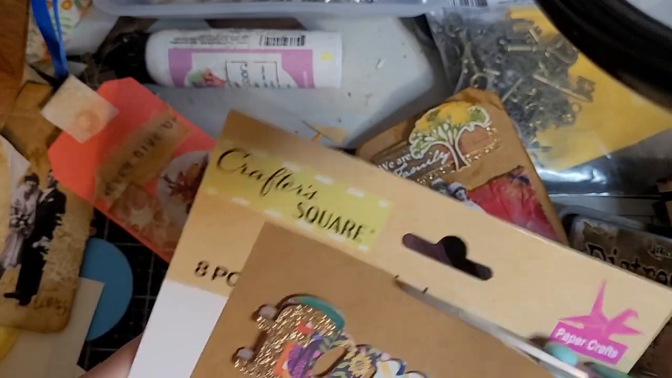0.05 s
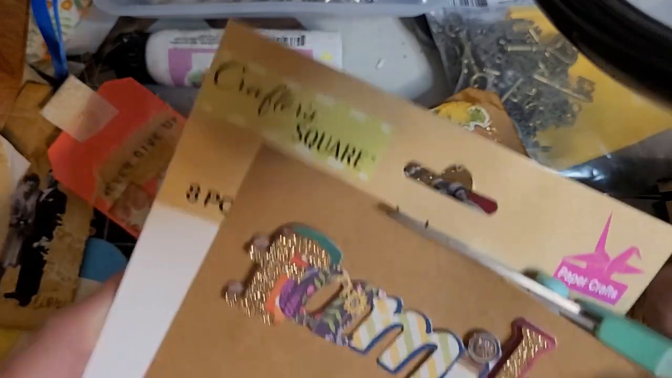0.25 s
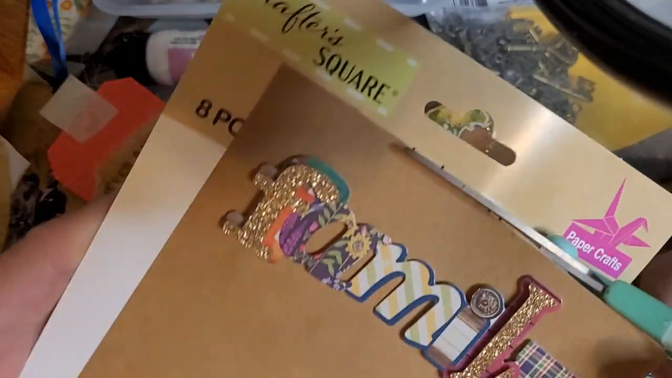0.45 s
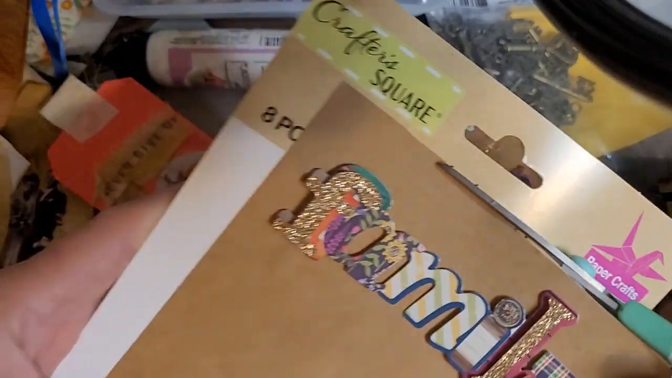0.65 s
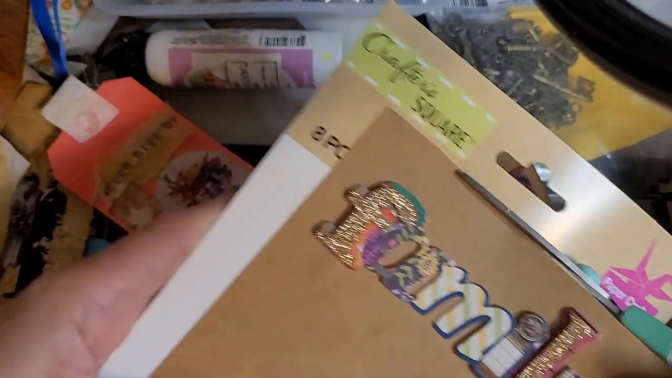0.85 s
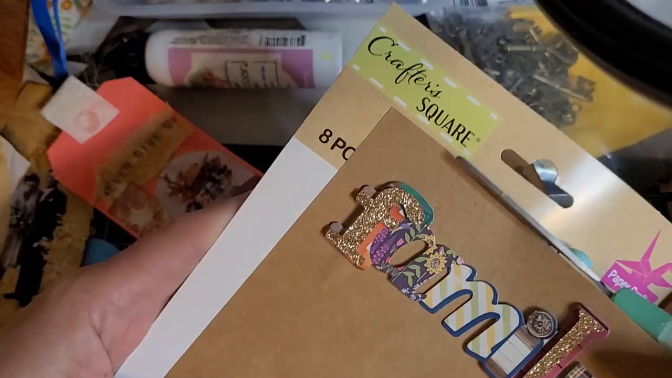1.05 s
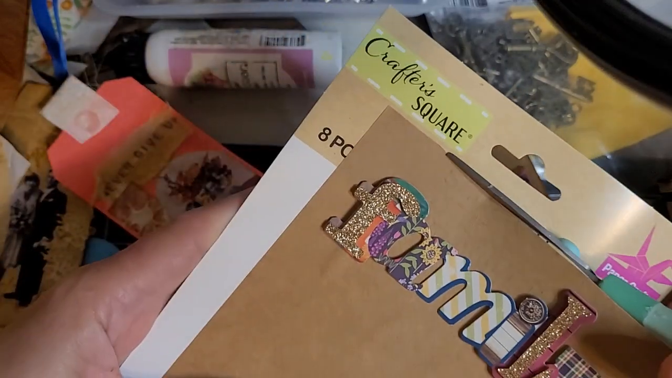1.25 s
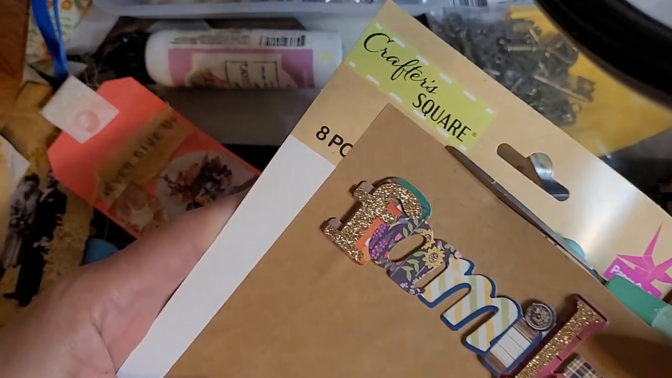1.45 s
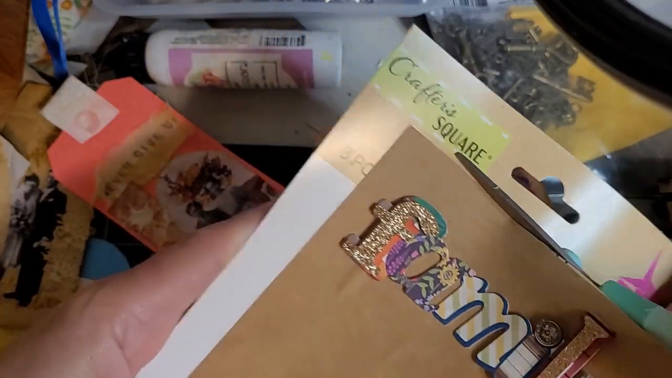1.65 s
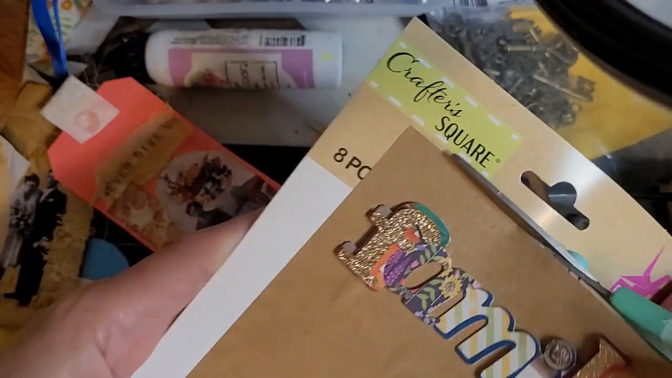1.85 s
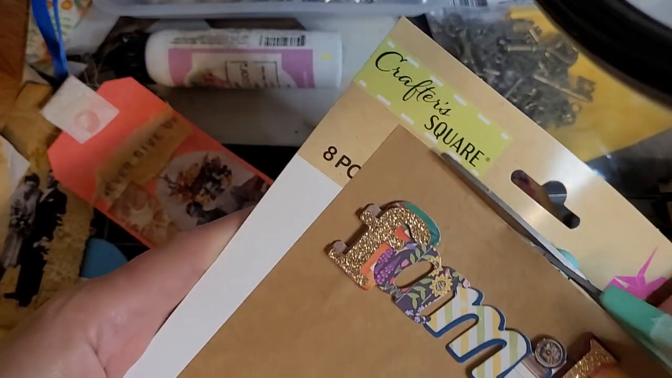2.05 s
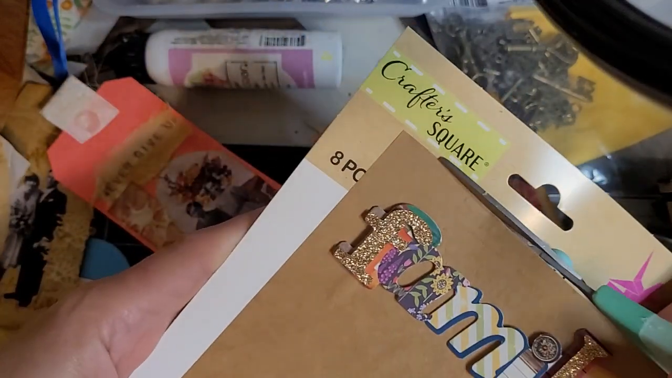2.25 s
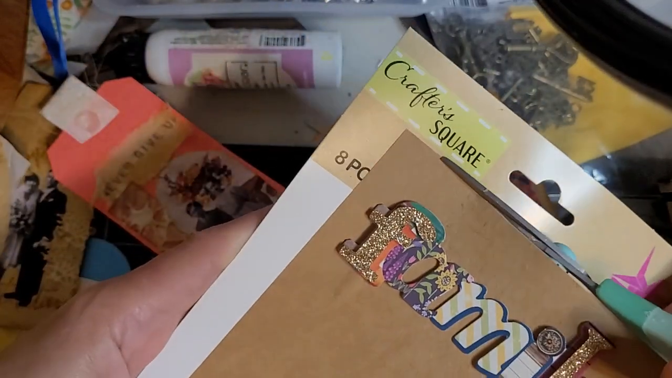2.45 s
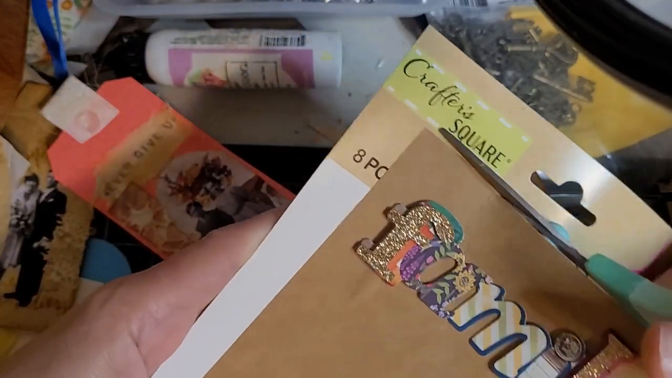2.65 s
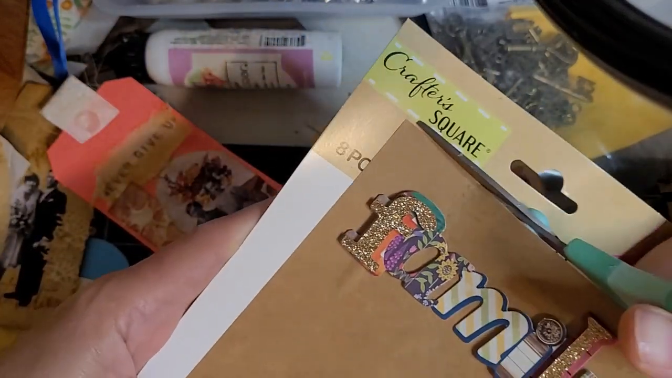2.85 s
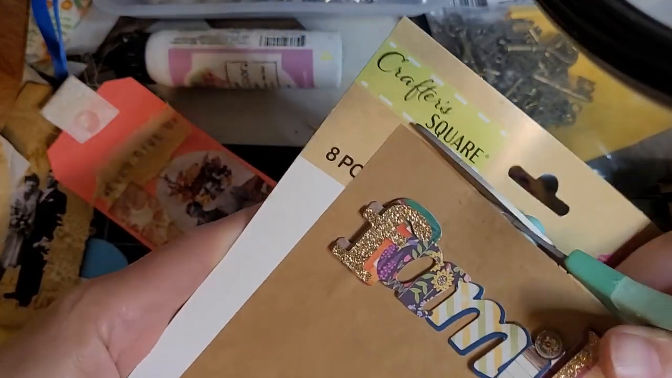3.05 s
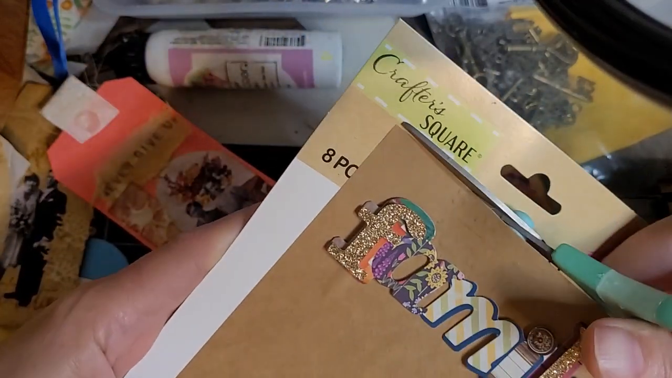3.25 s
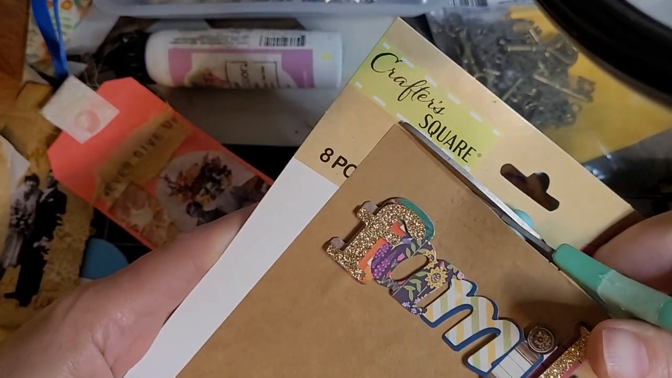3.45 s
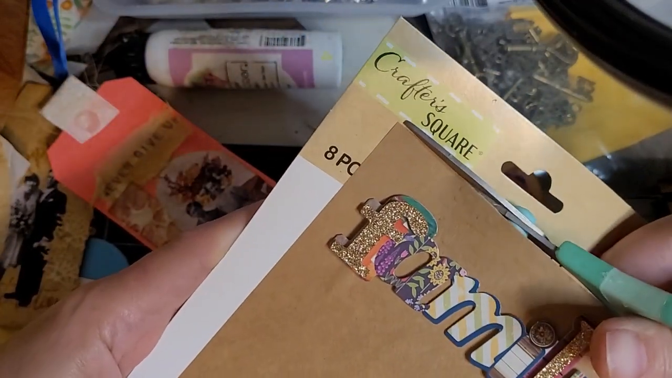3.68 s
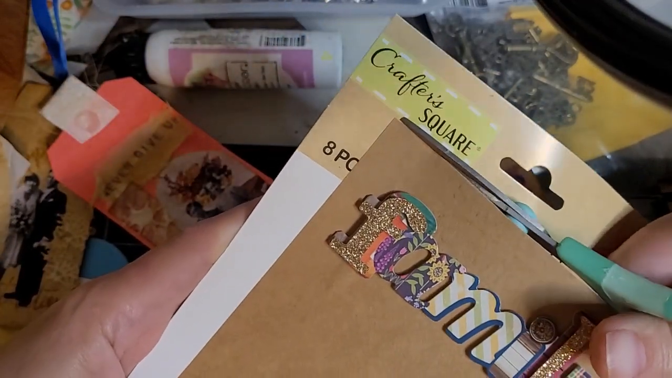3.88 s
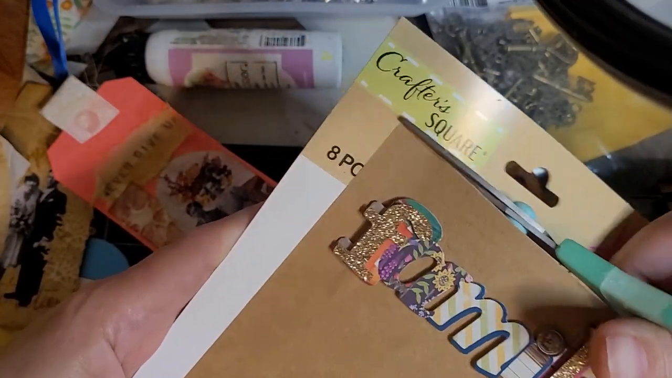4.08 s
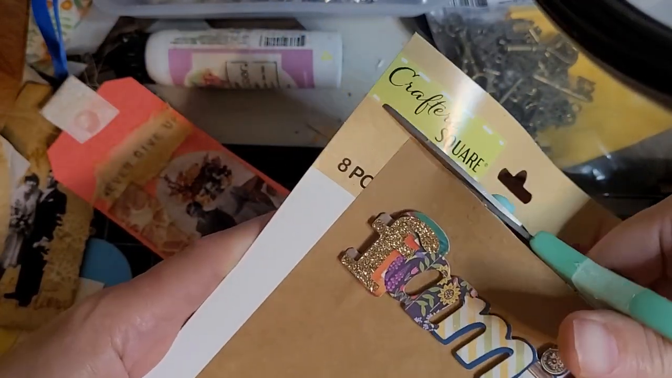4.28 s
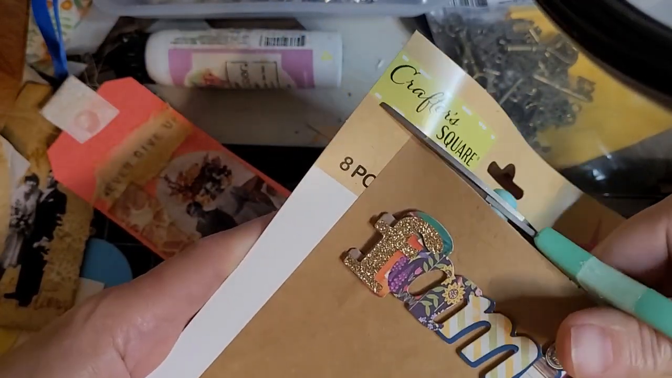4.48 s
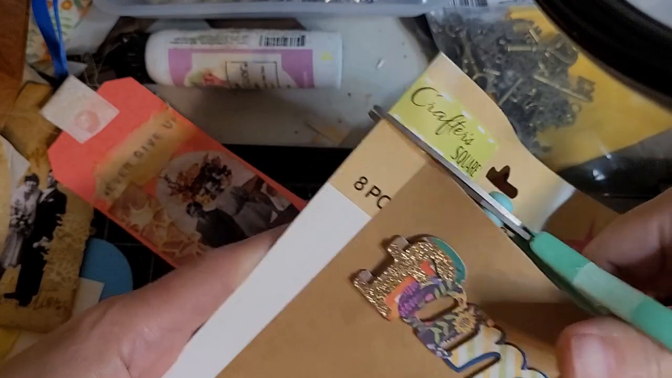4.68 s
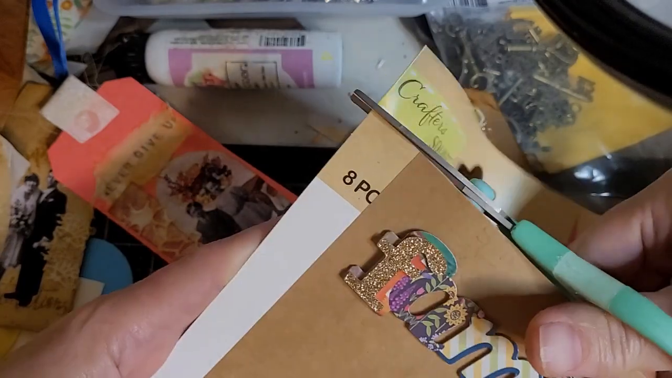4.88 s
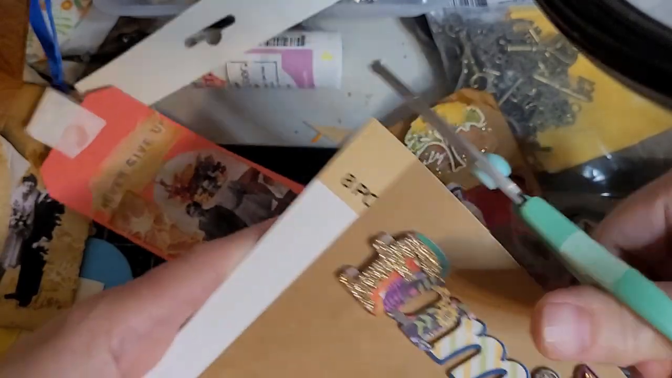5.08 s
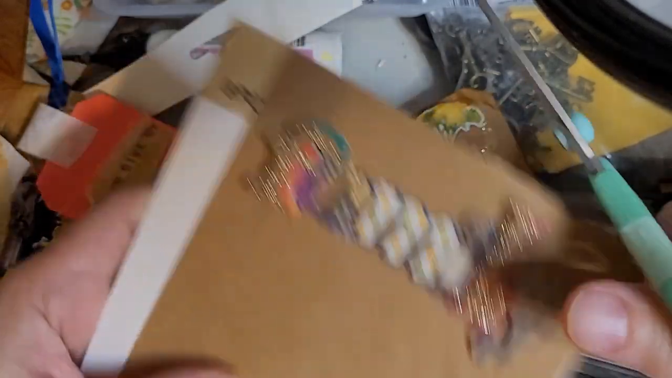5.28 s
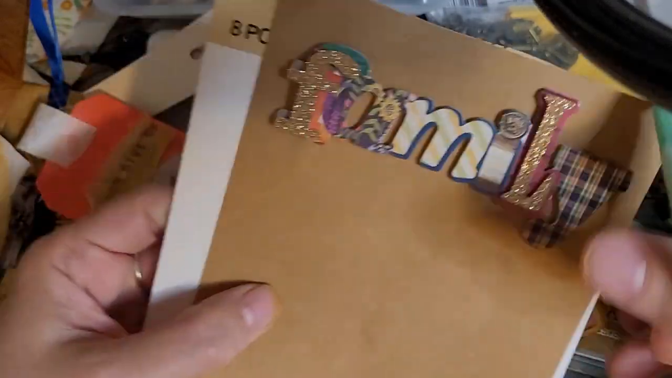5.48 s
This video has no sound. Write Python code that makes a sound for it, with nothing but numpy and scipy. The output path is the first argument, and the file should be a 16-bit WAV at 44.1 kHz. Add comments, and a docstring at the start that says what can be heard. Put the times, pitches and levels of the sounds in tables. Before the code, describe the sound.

A stiff card header is cut off by hand with scissors. Sparse scrapes and small crunches lead to a sharp pop of flexing card, followed by a gentle bump, grainy snips and a quiet pause around 3.3 seconds. A metallic click restarts the cutting, which becomes busier and ends in a strong snap and faint handling. Close stereo phone microphone, short room tail, faint low air.

```python
"""Scissors cut the header off a stiff card package, close to a phone above a craft table in a small room.
The card parts in jerks and friction grains rasp between them; each contact excites a resonant sheet
whose pitch changes as it bends, plus shaped noise clicks. The card snaps as it is flexed and as the strip
comes free, the steel ticks as damped modes, and the hands jolt softly as slow ones.
A short diffuse room tail and faint low air noise surround it."""
import sys
import numpy as np
from scipy import signal
from scipy.fft import rfft, irfft
from scipy.io import wavfile

SR = 44100
rng = np.random.default_rng(int(sys.argv[2]) if len(sys.argv) > 2 else 0)


def wav_record(signal):
    """Record a signal, one row per channel, as 16-bit PCM in the file named by sys.argv[1]."""
    frames = np.transpose(np.atleast_2d(signal))
    bounded = np.clip(frames, -1, 1)
    # unit amplitude maps onto the largest positive 16-bit level
    quanta = np.round(bounded * 32767).astype(np.int16)
    wavfile.write(sys.argv[1], SR, quanta)


N = 243644
TIME = np.arange(N) / SR
RING = TIME[:8192]  # time axis of every ringing response [s]

# Groups of jerks as the card parts, spaced evenly within each group; crack, fizz and edge relative to the sheet:
# (first jerk [s], last jerk [s], count, jerk length [s], sheet level [dB], swell over the group [dB],
#  crack [dB], fizz [dB], steel edge [dB], sheet pitch [Hz])
JERK_GROUPS = [(0.099, 0.116, 2, 0.018, -36.5, -4, -10, -12, -27, 800),
               (0.604, 0.664, 4, 0.012, -53, 4.5, -0.5, -5.5, -5.5, 690),
               (0.736, 0.76, 2, 0.012, -50.5, 1, 0, -8, -11, 720),
               (1.17, 1.266, 5, 0.017, -46, 6.5, -5.5, -11.5, -7, 805),
               (2.201, 2.251, 3, 0.018, -42.5, 1, -4, -6.5, -6.5, 1126),
               (2.346, 2.377, 2, 0.015, -30.5, 1, -10.5, -14, -17, 526),
               (2.552, 2.574, 2, 0.021, -38, -1, -5, -16.5, -26, 900),
               (2.627, 2.686, 2, 0.013, -36, 0, -6, -16, -25.5, 653),
               (3.603, 3.624, 2, 0.015, -39.5, 4, -6.5, -9.5, -10, 920),
               (3.734, 3.753, 2, 0.015, -40, 3, -5.5, -9, -12, 940),
               (3.785, 3.808, 2, 0.015, -42.5, 3, -3, -11, -11.5, 880),
               (3.847, 3.87, 2, 0.017, -37.5, 0.5, -7, -13, -22, 910),
               (3.903, 3.916, 2, 0.013, -43, -3, -7, -13.5, -22, 890),
               (4.428, 4.454, 2, 0.015, -37.5, 7, -8, -7.5, -25, 610),
               (4.486, 4.517, 2, 0.018, -37.5, -3, 0.5, -4, -18, 690),
               (4.552, 4.586, 2, 0.011, -43.5, -6, 6.5, 3.5, -21, 785),
               (4.922, 4.943, 2, 0.0096, -35.5, 1.5, 0.5, 0, -5, 830),
               (5.058, 5.079, 2, 0.013, -43, -4, 2.5, -1.5, -23, 950)]
# Further single jerks of parting card; crack and fizz are relative to the sheet:
# (time [s], sheet level [dB], crack [dB], fizz [dB], sheet pitch [Hz])
SINGLE_JERKS = [(0.138, -46, -7, -26, 550), (0.692, -48, -13, -14, 680), (0.788, -54.5, -5, -10.5, 676),
                (0.861, -45, 0.5, -32, 860), (1.661, -35.5, 0, -5.5, 645), (2.303, -54, -2, -1.5, 940),
                (2.425, -53, -3, -7.5, 955), (3.69, -50, -2.5, -8, 1080), (3.95, -37, -3, -7.5, 884),
                (4.175, -38.5, -6, -24, 440), (4.473, -44.5, -3.5, -7, 706), (5.126, -40, -9.5, -11.5, 480),
                (5.168, -52.5, -17, -24, 645), (5.196, -52, -2, -5, 804), (5.369, -36.5, -13.5, -21, 820)]
SINGLE_JERK_S = 0.015  # length of a single jerk
EDGE_HZ, EDGE_T60 = 11380, 0.0025  # the steel edge sings as it cuts: pitch [Hz], decay [s]


def jerks(bend_spread=0.017):
    """Stick-slip: the card parts in groups of jerks that ring sheet and steel edge, and in further single jerks."""
    out = np.zeros(N)
    for first, last, count, length, db, swell, crack, fizz, edge, hz in JERK_GROUPS:
        for progress in np.linspace(0, 1, round(count)):
            s = first + progress * (last - first)
            level = db + swell * (progress - .5)
            bent_hz = hz * np.exp(bend_spread * rng.standard_normal())
            force, sound = jerk(length, level, crack, fizz, bent_hz)
            add(out, s, sound)
            edge_sound = signal.fftconvolve(force, ring([(EDGE_HZ, 0, EDGE_T60)]))
            add(out, s, burst(edge_sound, level + edge))
    for s, db, crack, fizz, hz in SINGLE_JERKS:
        _, sound = jerk(SINGLE_JERK_S, db, crack, fizz, hz)
        add(out, s, sound)
    return out


def jerk(length, db, crack, fizz, hz, lean=0.58):
    """Fracture as a swell of impulses: fibres break in a lobe leaning early; returns force and sound."""
    progress = np.linspace(0, 1, int(length * SR))
    swell = np.sin(np.pi * progress ** lean)
    force = fibres(len(progress), per_s=9000, spread_db=3) * swell
    return force, excite(force, hz, db, db + crack, db + fizz)


def fibres(n, per_s, spread_db):
    """Sparse impulse noise: random tiny breaks of either sign, a few much larger than the rest."""
    when, size, sign = rng.random((3, n))
    strength = undb(-spread_db * np.log(np.maximum(size, .02)))
    return (when < per_s / SR) * strength * np.sign(sign - .5)


# Lower colour of parting fibres: (frequency [Hz], level [dB])
CRACK = [(700, -49), (1300, 2), (1650, -1.5), (2300, -1), (3300, -3.5), (4500, -3.5), (5800, -11.5),
         (8000, -25.5)]
# Upper colour of parting fibres: (frequency [Hz], level [dB])
FIZZ = [(4000, -30), (6000, 0.5), (9600, -0.5), (10700, -2.5), (11900, -1.5), (13500, -7), (16000, -9.5)]


def excite(force, hz, body_db, crack_db, fizz_db, tilt=0.67, usual_db=5):
    """Source-filter: a contact rings the sheet and radiates crack and fizz; less fizz also darkens their colour."""
    tilt_db = tilt * (fizz_db - crack_db + usual_db)
    parts = (
        (sheet(hz), body_db),
        (click(varied(CRACK, tilt_db)), crack_db),
        (click(varied(FIZZ, tilt_db)), fizz_db),
    )
    out = np.zeros(len(force) + len(RING))
    for response, db in parts:
        add(out, 0, burst(signal.fftconvolve(force, response), db))
    return out


def varied(points, tilt_db, vary_db=2):
    """Spectral tilt in dB per octave, with scatter: no two bunches of fibres have quite the same colour."""
    hz, db = np.transpose(points)
    octaves = np.log2(hz / hz[0])
    return np.transpose([hz, db + tilt_db * octaves + vary_db * rng.standard_normal(len(hz))])


# Fixed modes of the card sheet: (frequency [Hz], level [dB], free decay t60 [s])
SHEET = [(243.6, -4.5, 0.073), (308, -6.5, 0.053), (411, -6.5, 0.067), (506, -0.5, 0.045),
         (618, -2.5, 0.032), (761, 1.5, 0.033), (849, -1.5, 0.057), (951.5, -3, 0.055), (1140, -2.5, 0.035),
         (1277, -13, 0.044)]


def sheet(hz, bend_t60=0.023, modes_db=-3.0, radiate_hz=260):
    """Modal resonance: fixed modes plus one resonance set by the bend; a small sheet radiates little bass."""
    bend = ring([(hz, 0, bend_t60)])
    swing = bend + undb(modes_db) * ring(SHEET)
    return signal.lfilter(*signal.butter(2, radiate_hz, "high", fs=SR), swing)


def slide(catch_db=1, catch_hz=130, trim_db=-1):
    """Granular friction: fine grains catch and ease at random as blades and fingers slide on the card."""
    knots = np.arange(0, N, SR / catch_hz)
    wander = np.interp(np.arange(N), knots, rng.standard_normal(len(knots)))
    catch = undb(catch_db * wander)

    def rub(response):
        """Convolution: a fresh stream of grains drives one response."""
        return signal.fftconvolve(fibres(N, per_s=20000, spread_db=2) * catch, response)[:N]

    # the contact keeps moving, so each mode has its own grains; here its decay is halved
    body = sum(undb(db) * rub(ring([(hz, 0, t60 * .5)])) for hz, db, t60 in SHEET)
    body = signal.lfilter(*signal.butter(2, 220, "high", fs=SR), body)
    layers = body, rub(click(CRACK)), rub(click(FIZZ))
    levelled = sum(x / x.std() * level for x, level in zip(layers, stroke_levels()))
    return undb(trim_db) * levelled


# Strokes of blades and fingers on card, before the slide's trim; crack and fizz are relative to the sheet:
# (time [s], length [s], sheet level [dB], swell over the stroke [dB], crack [dB], fizz [dB])
STROKES = [(0.081, 0.056, -46.5, 7, -3, -9), (0.197, 0.087, -63, 5.5, -5, -6),
           (0.383, 0.027, -69, -4, -22, -32), (0.591, 0.24, -66, -9.5, -0.5, -5.5),
           (0.864, 0.06, -44.5, 3.5, -2.5, -7), (0.945, 0.065, -50.5, -8, -7, -17),
           (1.058, 0.082, -61, -13, -9.5, -16), (1.17, 0.086, -56, 8, -4, -6),
           (1.336, 0.084, -63, 7, -12, -17), (1.481, 0.052, -50.5, -3.5, -12.5, -16.5),
           (1.578, 0.069, -48.5, 14, -14, -18), (1.686, 0.17, -51.5, -15.5, -13, -18.5),
           (1.888, 0.035, -46.5, 11.5, -8, -10.5), (2.165, 0.087, -58.5, 7, -10, -8.5),
           (2.22, 0.2, -58.5, 4, -1.5, -6.5), (2.556, 0.03, -39.5, -5, -14, -12),
           (2.627, 0.073, -52.5, -2, -2.5, -12.5), (2.941, 0.08, -63, -2, -8, -5),
           (3.11, 0.049, -56.5, -11, -2.5, -12.5), (3.197, 0.056, -74, -6.5, -3.5, -3),
           (3.598, 0.067, -53.5, -4, -9, -13), (3.99, 0.064, -73, -4, -6, -5),
           (4.116, 0.14, -46, 0.5, -1.5, -5.5), (4.332, 0.027, -49, 2, -6, -5.5),
           (4.444, 0.19, -54.5, -17, -5, -1), (4.652, 0.036, -51.5, 19.5, -2.5, -8.5),
           (4.7, 0.07, -40, -11, -3, -6), (4.842, 0.078, -47, 0.5, 2, 2.5),
           (4.948, 0.012, -40, -7.5, 3.5, 8), (5.047, 0.1, -59, -5.5, 2.5, -5),
           (5.196, 0.15, -65.5, -8.5, 0.5, -2), (5.377, 0.13, -58, -7.5, 0.5, 5.5)]
# The held card never quite rests, before the slide's trim: (sheet [dB], crack [dB], fizz [dB])
GRIP_DB = (-79, -86, -88.5)
STROKE_ATTACK_S, STROKE_RELEASE_S = 0.007, 0.013  # time constants of taking hold and letting go


def stroke_levels():
    """Power addition: strokes take hold, swell or ease, and let go, over the resting grip."""
    power = undb(GRIP_DB)[:, None] ** 2 + np.zeros(N)
    for s, length, db, swell, crack, fizz in STROKES:
        progress = np.clip((TIME - s) / length, 0, 1)
        before = np.maximum(s - TIME, 0) / STROKE_ATTACK_S
        after = np.maximum(TIME - s - length, 0) / STROKE_RELEASE_S
        fade = np.exp(-np.minimum(before + after, 20))
        envelope = undb(db + swell * (progress - .5)) * fade
        power += np.outer(undb([0, crack, fizz]), envelope) ** 2
    return np.sqrt(power)


# Card chafing against a blade: (time [s], length [s], level [dB], pitch [Hz])
CHAFES = [(0.846, 0.15, -64, 4700), (1.077, 0.018, -61, 3180), (2.169, 0.13, -67, 4370),
          (3.09, .07, -53.5, 805), (3.489, 0.06, -83, 2500), (4.215, 0.051, -49.5, 3540),
          (4.325, 0.055, -52, 630), (4.405, 0.049, -50, 780), (4.675, .085, -40, 2580)]


def chafes(edge_t60=0.0039):
    """Friction-driven resonance: dense slips ring one well-damped resonance of the card."""
    out = np.zeros(N)
    for s, length, db, hz in CHAFES:
        n = int(length * SR)
        slips = fibres(n, per_s=9000, spread_db=0.5) * np.hanning(n)
        rasp = signal.fftconvolve(slips, ring([(hz, 0, edge_t60)]))[:n]
        rasp = signal.lfilter(*signal.butter(2, hz / 2, "high", fs=SR), rasp)
        add(out, s, rasp / rasp.std() * undb(db))
    return out


# The sheet flicking or snapping: (time [s], body [dB], crack [dB], fizz [dB], sheet pitch [Hz])
SNAPS = [(0.252, -47.5, -59, -62, 640), (1.08, -41.5, -60, -68, 840), (1.305, -40, -44, -52.5, 637),
         (1.366, -44.5, -54.5, -74, 550), (1.667, -22, -27.5, -36, 726), (1.673, -24, -36, -57, 625),
         (1.686, -20.0, -27.5, -42.5, 792), (2.123, -46.5, -69.5, -100, 465), (3.969, -34.0, -42, -46, 883),
         (4.08, -51, -67, -74, 840), (4.788, -37, -49.5, -64.0, 840), (4.822, -48.5, -66, -78, 1000),
         (4.9579, -17.5, -23, -37, 827)]


def snaps(crumble_s=0.0023, crumble_db=-4):
    """Impulse excitation: one sharp release of the sheet, then a few milliseconds of crumbling edge."""
    out, t = np.zeros(N), RING[:1024]
    for s, body, crack, fizz, hz in SNAPS:
        crumble = fibres(len(t), per_s=7700, spread_db=4.5) * np.exp(-t / crumble_s)
        force = undb(crumble_db) * unit(crumble)
        force[0] += 1
        add(out, s, excite(force, hz, body, crack, fizz))
    return out


# Steel ticking on steel: (time [s], level [dB])
TICKS = [(1.404, -55.5), (1.9172, -38.5), (2.046, -57.5), (3.648, -30.5), (5.042, -37.5)]
# Modes of the blades: (frequency [Hz], level [dB], decay t60 [s])
BLADES = [(5180, -6, 0.043), (8200, 2.5, 0.012), (9790, 2, 0.021), (11600, 4, 0.012)]


def ticks(scrape_s=0.0029, ring_db=-3):
    """Damped modal impact: blade meets blade in a tiny noise scrape and a ring damped by the hand."""
    out = np.zeros(N)
    for s, db in TICKS:
        force = rng.standard_normal(len(RING)) * np.exp(-RING / scrape_s)
        scrape = signal.lfilter(click(FIZZ) + .5 * click(CRACK), 1, force)
        add(out, s, burst(unit(scrape) + undb(ring_db) * ring(BLADES), db))
    return out


# Soft jolts of hands and sheet: (time [s], level [dB], pitch [Hz], decay t60 [s])
JOLTS = [(1.666, -37.5, 252, 0.03), (1.921, -33, 844, 0.031), (1.924, -37, 251, 0.059),
         (1.931, -38.5, 61, 0.17), (4.96, -34.5, 121, 0.05), (4.961, -41, 60, 0.14)]


def jolts(push_s=0.00067):
    """Single-mode response: a soft push, with a gradual onset, swings one damped mode."""
    out = np.zeros(N)
    for s, db, hz, t60 in JOLTS:
        onset = 1 - np.exp(-RING / push_s)
        add(out, s, burst(ring([(hz, 0, t60)]) * onset, db))
    return out


def near_path(dry, lag, smear_s=0.0015):
    """Decorrelation: treble is partly smeared by short random responses, new per ear and block, for stereo width."""
    low, high = (signal.butter(3, 1400, kind, fs=SR) for kind in ("low", "high"))
    direct = np.pad(dry, (lag, 0))[:N]  # lag in samples
    treble = signal.lfilter(*high, direct)
    smeared, hop = np.zeros(N), 256
    for start in range(0, N, hop):
        response = unit(rng.standard_normal(hop) * np.exp(-RING[:hop] / smear_s))
        add(smeared, start / SR, np.convolve(treble[start:start + hop], response))
    return signal.lfilter(*low, direct) + .7 * treble + .7 * smeared


# Room decay by band: (centre frequency [Hz], decay t60 [s], level [dB])
ROOM = [(120, 1, -9), (343, 0.14, -12), (911, 0.15, -19), (2240, 0.11, -9), (5800, 0.13, -13),
        (12000, 0.11, -14.5)]


def room(build_s=0.0024):
    """Diffuse reverberation: band-filtered decaying noise forms the short tail of a small furnished room."""
    out = 0
    for hz, t60, db in ROOM:
        band = signal.butter(2, [hz / 1.6, min(hz * 1.6, .45 * SR)], "band", fs=SR)
        decay = undb(-60 * RING / t60)
        build = 1 - np.exp(-RING / build_s)
        tail = rng.standard_normal(len(RING)) * decay * build
        out = out + undb(db) * signal.lfilter(*band, unit(tail))
    return out


# Spectrum of the still air of the room: (frequency [Hz], level [dB])
AIR = [(20, -26), (48, 5.5), (85, 0.5), (130, 3), (170, -12), (250, -2), (400, -14), (750, -13.5),
       (1200, -25.5), (2500, -50.5), (6000, -41.5), (16000, -36)]
AIR_DB = -65.5  # RMS level over both ears


def air(side_db=-12):
    """Mid-side coherence: faint steady room rumble, nearly alike at both ears in the bass."""
    hz = np.fft.rfftfreq(N, 1 / SR)
    mid, side = rfft(rng.standard_normal((2, N))) * undb(gain_db(AIR, hz))
    side = side * np.minimum(undb(side_db) + hz / 5000, 1)
    both = irfft([mid + side, mid - side], N)
    return both * undb(AIR_DB) / both.std()


def ring(modes, place_db=4.0):
    """Modal superposition: decaying sines; the place of contact sets each one's strength and sense."""
    out = 0
    for (hz, db, t60), (strength, sense) in zip(modes, rng.standard_normal((len(modes), 2))):
        gain = np.sign(sense) * undb(db + place_db * strength)
        decay = np.exp(-np.log(1000) * RING / t60)
        out = out + gain * decay * np.sin(2 * np.pi * hz * RING)
    return unit(out)


def click(points, size=512):
    """Minimum phase: folding the cepstrum gives a causal click with the given spectrum."""
    log_gain = np.log(undb(gain_db(points, np.fft.rfftfreq(size, 1 / SR))))
    cepstrum = irfft(log_gain)
    cepstrum[1:size // 2] *= 2
    cepstrum[size // 2 + 1:] = 0
    return unit(irfft(np.exp(rfft(cepstrum))))


def gain_db(points, hz):
    """Log-frequency interpolation: read a spectrum's level at the given frequencies."""
    f, db = np.transpose(points)
    return np.interp(np.log(hz + 1), np.log(f), db)


def undb(db):
    """Decibel law: level to amplitude gain."""
    return 10 ** (np.asarray(db) / 20)


def unit(x):
    """Energy normalization: scale to an energy of one."""
    return x / np.sqrt(np.sum(x ** 2))


def burst(x, db):
    """Energy equivalence: scale a short sound to the energy of 10 ms at the given level."""
    return unit(x) * undb(db) * np.sqrt(SR / 100)


def add(track, s, x):
    """Linear superposition: mix a sound in at time s."""
    i = max(round(s * SR), 0)
    track[i:i + len(x)] += x[:max(N - i, 0)]


def scene(left_db=1.0):
    """Interaural differences: contacts close to the microphone pair, slightly left by level and lag."""
    dry = jerks() + snaps() + ticks() + jolts() + chafes() + slide()
    ears = []
    for lag in (0, 2):  # samples
        reverberant = signal.fftconvolve(dry, room())[:N]
        ears.append(near_path(dry, lag) + reverberant)
    return np.array(ears) * undb([[left_db], [-left_db]]) + air()


def record(dry):
    """Band limitation: the phone cuts the deepest bass and the top."""
    dry = signal.sosfilt(signal.butter(3, 38, "high", fs=SR, output="sos"), dry)
    return signal.sosfilt(signal.ellip(10, .2, 80, 15900, fs=SR, output="sos"), dry)


dry = scene()
out = record(dry)
wav_record(out)
```